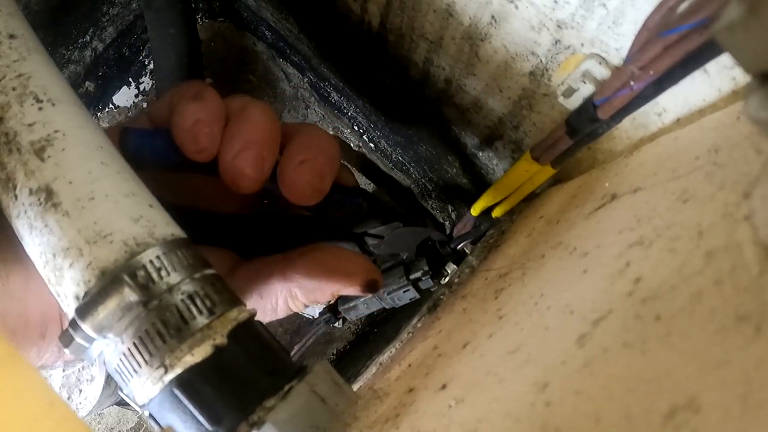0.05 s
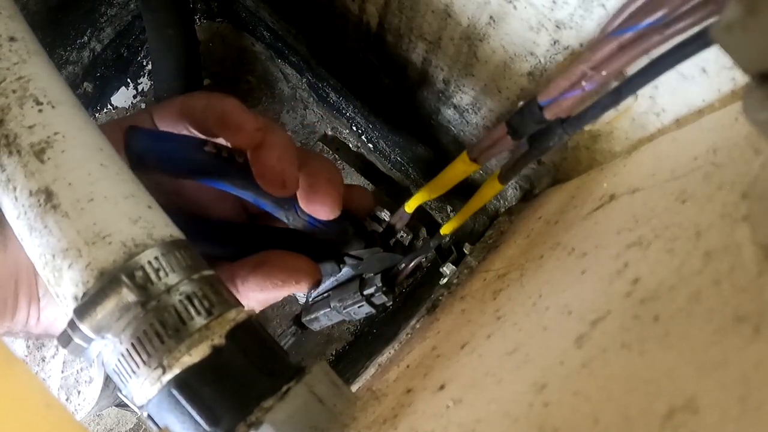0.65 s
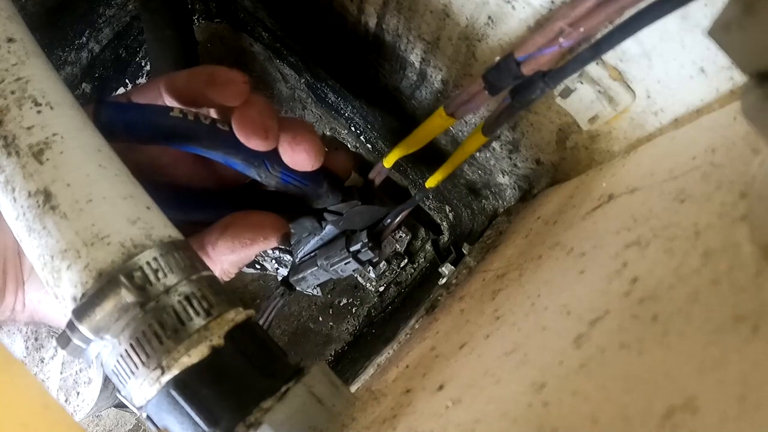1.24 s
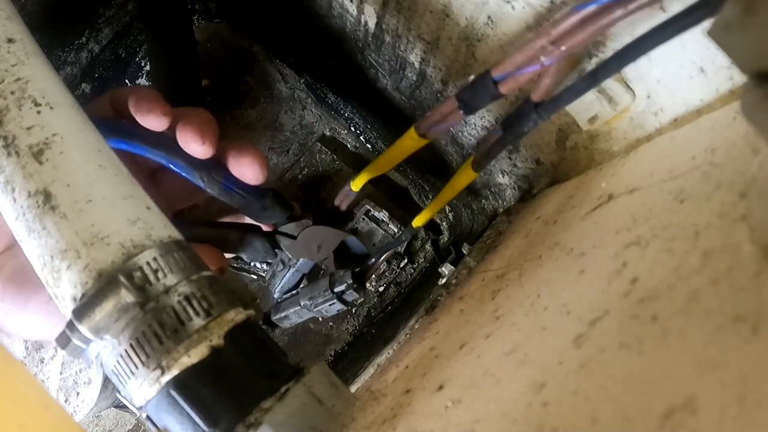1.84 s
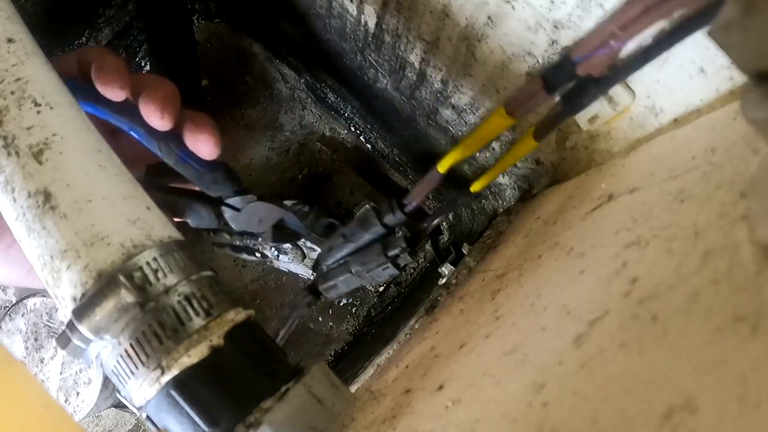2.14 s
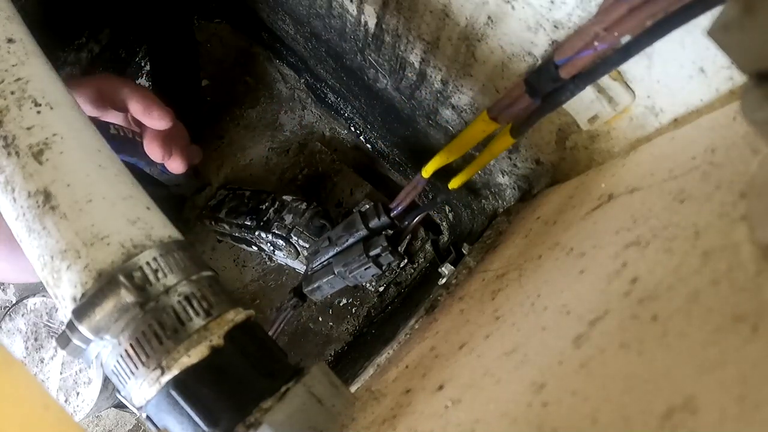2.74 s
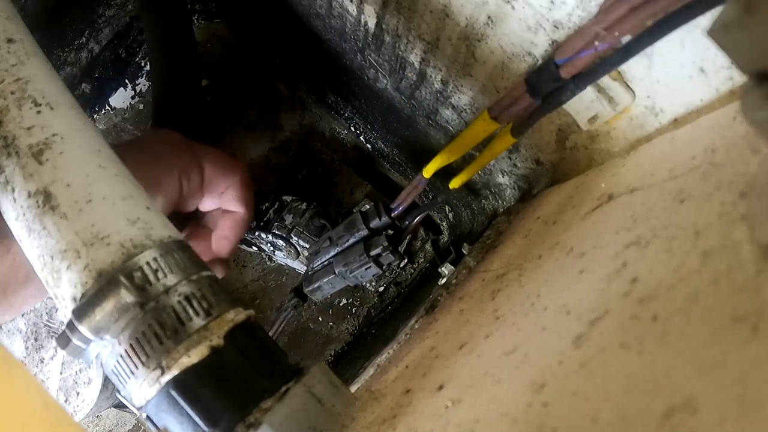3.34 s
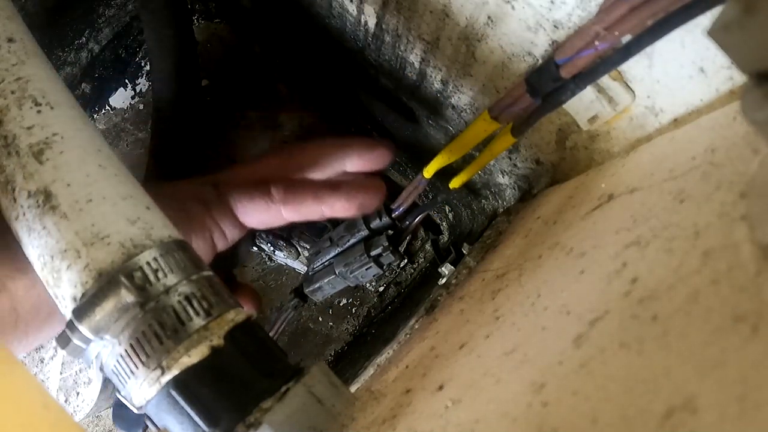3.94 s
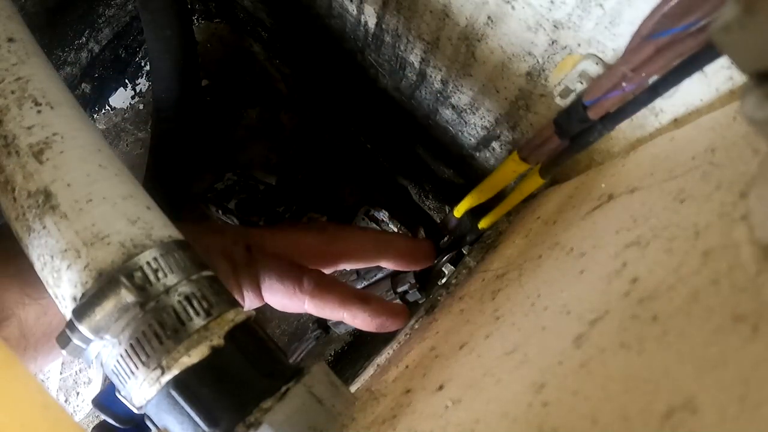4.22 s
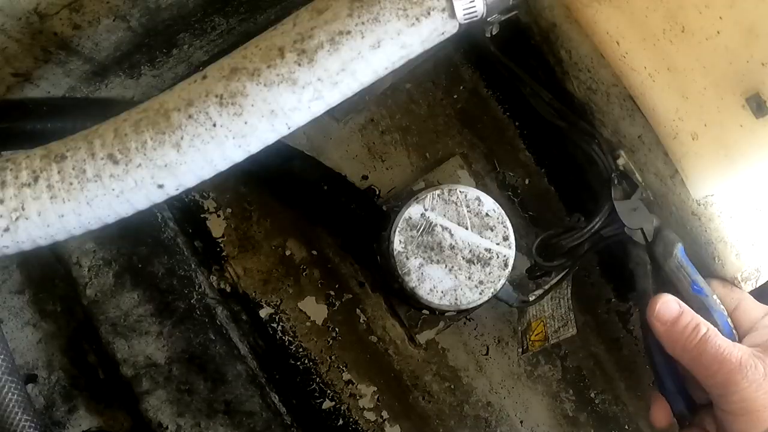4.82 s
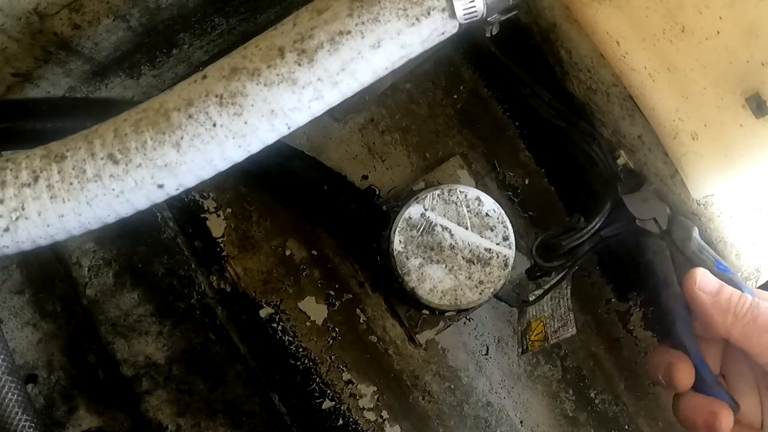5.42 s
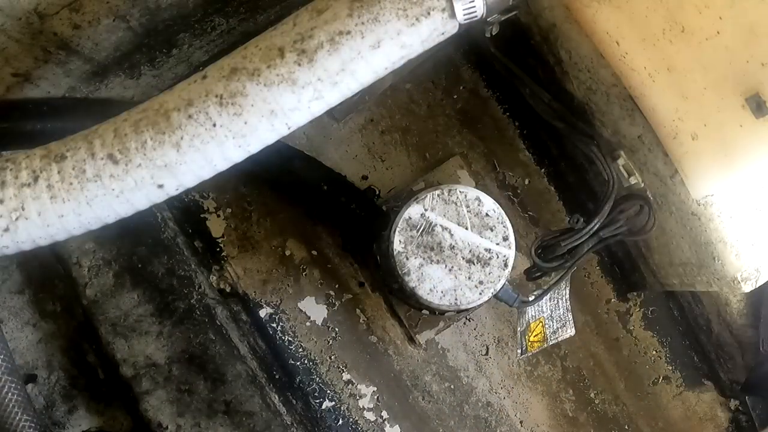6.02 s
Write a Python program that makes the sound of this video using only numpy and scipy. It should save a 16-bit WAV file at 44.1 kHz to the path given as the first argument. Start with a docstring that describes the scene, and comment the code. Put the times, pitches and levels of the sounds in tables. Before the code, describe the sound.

Close up in a cramped fibreglass boat compartment, a plastic tie cracks between cutter jaws and the tool bumps the hull. Soft handling leads to a cluster of metallic clacks and hollow knocks. Fingers then rustle quietly over the wiring, nudging creaky plastic connectors, before dry scrapes lead into another snip. Hand and tool finally slide across the hull. A slight deep rumble lies underneath.

```python
"""In a boat's bilge, hand cutters shear through a plastic tie on a wiring harness; the tie snaps and
the tool jerks against the hull. The cutters scrape and clack as they are put down, connectors knock,
a hand rubs along the wires, and a second tie is snipped. Impacts excite damped modes that ring in the
small fibreglass compartment; sliding contacts make stick-slip noise. A low rumble lies beneath."""
import sys
import numpy as np
from scipy import signal
from scipy.io import wavfile
from scipy.ndimage import uniform_filter1d

SR = 44100
rng = np.random.default_rng(int(sys.argv[2]) if len(sys.argv) > 2 else 0)


def persist_wave(psi):
    """Save psi, clipped to +-1, as 16-bit WAV."""
    counts = np.round(np.clip(psi, -1, 1) * 32767).astype(np.int16)
    wavfile.write(sys.argv[1], SR, np.atleast_2d(counts).T)


N = 272097
TIME = np.arange(N) / SR
EDGES_HZ = 22 * 2 ** (np.arange(30) / 3)   # third-octave bands
CENTRES_HZ = np.sqrt(EDGES_HZ[1:] * EDGES_HZ[:-1])
LONGEST_RING_S, FRICTION_TOP_HZ = 0.45, 12300
# Modes of the hull panel. Each row: frequency in Hz, level in dB, nominal t60 in seconds.
HULL_MODES = [(90, -12, 0.76), (190.6, -4.5, 0.33), (294, -4, 0.3), (400, -14.5, 0.11), (506, -4.5, 0.15),
              (584, -6.5, 0.16), (653, -15.5, 0.29), (810, -19.5, 0.092), (916, -12.5, 0.11),
              (1033, -14.5, .25), (1434, -21, 0.12), (1914, -16.5, 0.2)]
# Spectrum of a steel impact. Each row: frequency in Hz, spectral density in dB.
STEEL_COLOUR = [(100, -22), (400, -10), (800, -3.5), (1150, 0), (1500, 4), (1950, -3), (2500, -11),
                (4000, -19.5), (7000, -32.5), (13000, -58)]


def tie_snaps(bands):
    """Fracture: plastic releases its strain in cracks that excite the high modes of the biting jaws. The table
    also holds the sharp steel tick that opens the clink at 2.47 s."""
    # Each row: start in seconds, level in dB, tilt in dB per octave, relative crack level in dB.
    hits = [(0.293, -44.5, -0.5, 4.5), (0.305, -29.5, -4, 3.5), (0.3148, -24, 11, 20),
            (0.315, -29.5, -2.5, 12.5), (0.352, -27, -3.5, -4), (0.358, -25.5, -6.5, -6),
            (0.3628, -17, -6.5, 8.5), (1.622, -53.5, -6.5, 4), (1.88, -40.5, -6, -11),
            (2.241, -37, 0, -8.5), (2.261, -35, 0.5, -10), (2.2832, -31.5, -6, 16.5),
            (2.4663, -43.5, -2.5, -3.5), (2.574, -34.5, -3, -16), (5.215, -44, -9, -9),
            (5.539, -47, -14, -2), (5.5997, -21, 3.5, -17), (5.697, -53, -3, 14), (6.147, -43, -5.5, 3)]
    # Each row: frequency in Hz, spectral density in dB.
    colour = [(100, -15), (500, -4.5), (1000, 5.5), (2000, 10), (3200, 2.5), (4500, 8), (7900, -1.5),
              (9500, -13), (13000, -28.5), (16000, -48.5)]
    # Each row: frequency in Hz, level in dB, nominal t60 in seconds.
    modes = [(4500, -14.5, .1), (5230, -11.5, 0.11), (5590, -10.5, 0.058), (5720, -13, 0.11),
             (6670, -13.5, 0.11), (7153, -15, .08), (7800, -13.5, 0.077)]
    return impacts(bands, hits, colour, modes, crack_s=0.0015, wash_db=-1.5, rise_s=0.000067)


def tool_clacks(bands):
    """Hard impact: steel and connectors strike the hull, and the tool pressed against it rings."""
    # Each row: start in seconds, level in dB, tilt in dB per octave, relative crack level in dB.
    hits = [(.046, -62.5, 8.5, 7), (0.16, -40.5, -6.5, 4), (0.3157, -27, -3, 16), (0.3659, -20, 1.5, 1),
            (1.385, -60.5, 5.5, -4), (1.892, -42, -9.5, -5.5), (2.129, -47.5, -9, 15.5),
            (2.2059, -26.5, 5, -0.5), (2.22, -32, -2, -2.5), (2.254, -24.5, 1, 3.5), (4.157, -49.5, 2, -10),
            (4.279, -45, 0.5, 14.5), (4.286, -33, -10.5, 9.5)]
    # Each row: frequency in Hz, level in dB, nominal t60 in seconds.
    modes = [(850, -16.5, 0.13), (958, -19, .19), (1430, -11, 0.09), (1740, -14, 0.17), (1632, -13, 0.15),
             (1960, -9.5, 0.27)]
    return impacts(bands, hits, STEEL_COLOUR, modes, crack_s=0.0012, wash_db=-2.0, rise_s=0.000077)


def tip_taps():
    """Damped oscillation: a steel tip meets the hull with one short ping, pitched by the spot it hits."""
    # Each row: start in seconds, level in dB, frequency in Hz, t60 in seconds.
    taps = [(2.2067, -16.5, 1793, 0.03), (2.253, -5.5, 1790, 0.02), (2.2727, -13.5, 1760, .03),
            (2.4662, 0, 1470, 0.0067), (3.2945, -27, 478, 0.083)]
    out, rise_s = np.zeros(N), 0.0008
    for start_s, db, hz, t60 in taps:
        at = round(start_s * SR)
        t = TIME[:min(int(LONGEST_RING_S * SR), N - at)]
        envelope = from_db(db - 60 * t / t60) * (1 - np.exp(-t / rise_s))
        out[at:at + len(t)] += envelope * np.sin(2 * np.pi * hz * t)
    return out


def jaw_clinks(bands):
    """Free vibration: the steel jaws ring in their own modes, lower when held."""
    # Each row: start in seconds, level in dB, tilt in dB per octave, relative crack in dB, pitch ratio.
    hits = [(2.208, -34, 7, 1, 0.93), (2.254, -34.5, 2.5, -4, 0.97), (2.2834, -35, 0.5, 0, 0.97),
            (2.467, -24, -1.5, 9, 0.97)]
    # Each row: nominal frequency in Hz, level in dB, nominal t60 in seconds.
    modes = [(976, -5.5, .3), (1076, -7.5, 0.22), (1313, 2, 0.16), (1527, -.5, .15), (2007, 11, 0.15),
             (2465, -16.5, .17), (3620, -18.5, .12), (4050, -15.5, 0.16)]
    return sum(impacts(bands, [hit], STEEL_COLOUR, modes, crack_s=0.001, wash_db=-4.5, rise_s=0.00019,
                       pitch=pitch, bloom_s=0.0091) for *hit, pitch in hits)


def connector_knocks(bands):
    """Hollow-body resonance: connector housings answer a knock with a few close modes."""
    # Each row: start in seconds, level in dB, tilt in dB per octave, relative crack in dB, pitch ratio.
    hits = [(2.256, -20, 5.5, -20, 1.06), (2.279, -25, 5, -10, 1.12), (2.302, -28, -5, 1, 1.1),
            (2.325, -40, -1, -4, 1.1), (2.572, -22.5, -7, 8.5, .8), (3.294, -41.5, 2, -28, .8),
            (4.376, -41, -2, -31, 1.0), (4.771, -36, -5, -1.5, 0.96), (4.793, -36.5, -5.5, -4.5, 1.06),
            (5.7975, -31.5, -5.5, 8, 0.9)]
    # Each row: frequency in Hz, spectral density in dB.
    colour = [(100, -22), (400, -6.5), (800, -2), (1200, -3.5), (2000, -15), (5000, -16), (13000, -47)]
    # Each row: nominal frequency in Hz, level in dB, nominal t60 in seconds.
    modes = [(674.4, 1, 0.035), (690, -9.5, 0.19), (765, 1, 0.16), (835, -13.5, 0.073)]
    return sum(impacts(bands, [hit], colour, modes, crack_s=0.0067, wash_db=-17.5, rise_s=0.00068,
                       pitch=pitch) for *hit, pitch in hits)


def hull_thuds(bands):
    """Plate vibration: duller blows shake the low modes of the hull panel."""
    # Each row: start in seconds, level in dB, tilt in dB per octave, relative crack level in dB.
    hits = [(0.033, -47, -11, 9), (0.3145, -23.5, -10.5, 15.5), (0.33, -23.5, -16, 9),
            (0.3669, -20, 0.5, 1.5), (1.384, -41, -11.5, 8), (1.449, -50, -9.5, 4.5), (1.682, -32.5, -7, 6),
            (1.699, -35, -10.5, 6), (1.886, -38, -6.5, -1.5), (2.021, -42.5, -7, -11),
            (2.187, -31, -5, -0.5), (2.255, -24, -3.5, -3.5), (2.468, -30, 4.5, -10.5), (2.571, -19, 0, 0),
            (2.599, -12.5, -20.5, -5.5), (2.758, -34, -7.5, -2), (3.234, -45, -9, 3.5),
            (3.294, -31.5, -4.5, -10), (3.324, -36, -3, -14.5), (4.205, -40, -2, -24),
            (4.382, -45.5, -2, 1), (5.794, -34, -5, -1)]
    # Each row: frequency in Hz, spectral density in dB.
    colour = [(40, -20.5), (90, -8), (160, -0.5), (300, 2.5), (400, -6), (600, -3.5), (900, -14),
              (1400, -16), (3000, -25), (6000, -45), (13000, -65)]
    return impacts(bands, hits, colour, HULL_MODES, crack_s=0.016, wash_db=-6.5, rise_s=0.00066)


def tool_chatter():
    """Stick-slip excitation: steel and connectors judder along the fibreglass."""
    # Each row: peak time in seconds, level in dB, swell and fade in seconds.
    slides = [(2.285, -26, 0.082, 0.056)]
    # Each row: frequency in Hz, nominal bandwidth in Hz, level in dB.
    modes = [(824, 70, 3.5), (1330, 87, -13.5), (1760, 210, -5.5), (2738, 540, -10), (3770, 1200, -13),
             (6260, 3700, -27.5)]
    return slip_resonance(slides, modes, per_s=260, smear_s=0.0092, share=0.98)


def connector_creaks():
    """Stick-slip excitation: a connector creaks as the fingers push it aside."""
    # Each row: peak time in seconds, level in dB, swell and fade in seconds.
    pushes = [(4.157, -44, 0.0019, 0.035), (4.203, -36, 0.0033, .04), (4.23, -35, 0.066, 0.057),
              (4.29, -33, 0.017, 0.033), (4.779, -44, 0.013, 0.021)]
    # Each row: frequency in Hz, nominal bandwidth in Hz, level in dB.
    modes = [(249.2, 58, 4), (793, 89, 2.5), (1445, 77, 4.5), (1776, 260, 1.5), (3100, 840, -16.5),
             (3690, 1300, -25.5)]
    return slip_resonance(pushes, modes, per_s=330, smear_s=0.0018, share=0.3)


def tie_rasps():
    """Roughness excitation: ribbed plastic crunches in the jaws or rasps on an edge."""
    # Each row: peak time in seconds, level in dB, swell and fade in seconds.
    rasps = [(.313, -36, 0.026, .01), (4.88, -52.5, .03, 0.11), (5.229, -52, 0.011, 0.039),
             (5.918, -50.5, 0.22, 0.059)]
    # Each row: frequency in Hz, nominal bandwidth in Hz, level in dB.
    modes = [(1611, 93, 6.5), (2395, 130, -6), (3404, 130, -2), (3870, 125, -0.5), (4330, 193, -1),
             (6810, 1800, -9)]
    return slip_resonance(rasps, modes, per_s=700, smear_s=0.0015, share=0.34)


def harness_settling(bands):
    """Forced vibration: the freed harness shivers with a soft wash and keeps hull and tool ringing."""
    # Each row: peak time in seconds, level in dB, swell and fade in seconds.
    shivers = [(.38, -41, .02, 0.38), (1.09, -57, 0.2, 0.085)]
    # Each row: frequency in Hz, spectral density in dB.
    colour = [(100, -0.5), (250, 6), (500, 2), (1000, 1), (1700, -3), (2500, -7), (4000, -29),
              (12000, -54.5)]
    # Each row: frequency in Hz, nominal bandwidth in Hz, level in dB.
    tool_modes = [(953, 36, -0.5), (1170, 65, -5), (1437, 60, -8), (1660, 50, -8.5), (1840, 130, -8.5),
                  (2240, 70, -11), (2850, 160, -17)]
    hull_modes = [(hz, 7.8 / t60, db) for hz, db, t60 in HULL_MODES]   # faster decay, wider resonance
    hull = slip_resonance(shivers, hull_modes, per_s=230, smear_s=0.005, share=0.21)
    tool = slip_resonance(shivers, tool_modes, per_s=230, smear_s=0.005, share=0.21)
    wash = stroke_envelope(shivers) * coloured(bands, colour)
    return from_db(-3) * (wash + hull) + from_db(-6.5) * tool


def hiss_and_scrapes(bands):
    """A faint noise swells for an instant before the clink at 2.47 s; later, dry friction scrapes lead into the
    second snip."""
    # Each row: peak time in seconds, level in dB, swell and fade in seconds.
    swells = [(2.46, -48, .05, 0.023), (4.78, -50, 0.017, 0.029), (4.875, -46, 0.06, 0.071),
              (5.6, -28.5, 0.062, 0.065)]
    # Each row: frequency in Hz, spectral density in dB.
    colour = [(100, -3.5), (500, -7), (830, 8.5), (1150, 0.5), (1650, 5), (2600, -9), (4200, -11),
              (7500, -13), (10000, -31.5), (14000, -54.5)]
    grain = stick_slip(per_s=300, smear_s=0.0088, share=0.33)
    return stroke_envelope(swells) * coloured(bands, colour) * grain


def rubs_and_swell(bands):
    """Soft friction of skin in rubbing strokes, and a short swell of noise just before the thud at 2.57 s."""
    # Each row: peak time in seconds, level in dB, swell and fade in seconds, extra treble in dB.
    swells = [(0.164, -53.5, 0.008, 0.047, -2.5), (.662, -47.5, 0.014, 0.026, -11.5),
              (1.09, -68, 0.4, 0.057, 1.5), (1.51, -58, 0.029, 0.021, -17),
              (1.706, -50, 0.074, 0.11, -12.5), (1.88, -44, 0.017, 0.08, -4),
              (2.02, -61.5, 0.083, 0.12, -4.5), (2.571, -45, 0.02, .02, -4), (3.032, -65, 0.06, 0.19, 8),
              (3.255, -51.5, 0.1, 0.54, 0), (3.335, -51, 0.11, .17, -6.5),
              (3.446, -47.5, 0.027, 0.058, -0.5), (3.59, -65.5, 0.12, 0.25, -1.5),
              (4.13, -60, 0.16, 0.14, -3.5), (4.55, -74, 0.043, 0.071, 16.5), (4.69, -80, .06, 0.26, 11.5),
              (4.882, -60, 0.14, 0.24, 9.5), (4.955, -65, .05, 0.095, 10.5), (5.119, -55, 0.054, 0.63, -4),
              (5.228, -48.5, 0.031, 0.073, 1), (5.431, -64.5, 0.088, 0.15, 5.5),
              (5.771, -54, 0.036, 0.11, 1)]
    # Each row: frequency in Hz, spectral density in dB.
    colour = [(150, 7), (400, -4.5), (900, -9.5), (1600, 6), (2600, -1), (4000, 1.5), (7500, -2),
              (10000, -13), (12500, -15)]
    noise = coloured(bands, colour) * stick_slip(per_s=170, smear_s=0.018, share=0.91)
    noise = signal.sosfilt(lowpass(FRICTION_TOP_HZ, order=10), noise)
    body = signal.sosfiltfilt(lowpass(hz=3800, order=1), noise)
    body_gain = stroke_envelope([row[:-1] for row in swells])
    treble_gain = stroke_envelope([(s, db + extra, swell, fade) for s, db, swell, fade, extra in swells])
    return body_gain * body + treble_gain * (noise - body)


def hull_drags(bands):
    """Sliding friction: hand and tool drag out over the hull, each stroke with its own brightness."""
    # Each row: peak time in seconds, level in dB, swell and fade in seconds, tilt in dB per octave.
    drags = [(5.714, -42, 0.025, 0.41, -12), (5.924, -33.5, 0.14, 0.061, 2.5),
             (6.04, -40, 0.057, 0.47, -14), (6.17, -32, 0.098, .1, -0.5)]
    # Each row: frequency in Hz, spectral density in dB.
    colour = [(50, -27.5), (130, 6), (300, 7), (600, 3.5), (1100, -3), (2200, -18), (4400, -22),
              (7500, -35), (12000, -46), (15000, -74)]
    noise = sum(stroke_envelope([drag]) * coloured(bands, colour, tilt_db) for *drag, tilt_db in drags)
    return noise * stick_slip(per_s=420, smear_s=0.0042, share=0.6)


def wall_echoes(sound):
    """Comb filtering: early reflections, dulled by hoses and wires, make the sound boxy."""
    # Each row: delay in seconds, gain as a ratio.
    echoes = [(.00197, 0.098), (.0034, -0.11), (.0051, -0.034), (.0076, -.3), (0.0093, 0.38)]
    out, dull = sound.copy(), signal.sosfilt(lowpass(hz=4500, order=2), sound)
    for delay_s, gain in echoes:
        lag = round(delay_s * SR)
        out[:, lag:] += gain * dull[:, :N - lag]
    return from_db(-1.5) * out


def rumble(bands):
    """Amplitude modulation: a deep boom swells and sinks, while the faint air above it stays even."""
    # Each row: time in seconds, relative level of the boom in dB.
    levels = [(0.1, -39.5), (0.34, -28), (0.41, -41), (0.59, -43), (0.82, -59.5), (0.91, -47),
              (1.91, -36.5), (3.0, -37), (3.24, -45.5), (3.32, -29), (3.46, -45.5), (3.55, -36),
              (4.96, -46), (5.95, -41.5)]
    # Each row: frequency in Hz, spectral density in dB.
    colour = [(22, -22), (32, -5), (41, 3), (52, -7.5), (68, -24.5), (92, -11), (125, -26.5), (250, -33),
              (450, -51.5), (800, -59), (1400, -53.5), (3000, -63.5), (8000, -68), (14000, -85)]
    gains, deep = np.float32(band_gains(colour)), CENTRES_HZ < 60
    swell = from_db(np.interp(TIME, *np.transpose(levels)) - 0.5)
    boom = swell * np.tensordot(gains * deep, bands, 1)
    air = from_db(-40.5) * np.tensordot(gains * ~deep, bands, 1)
    return boom + air


def impacts(bands, hits, colour, modes, crack_s, wash_db, rise_s, pitch=1, bloom_s=0):
    """Impulse response: a short crack, a wash of reflections dying band by band, and decaying modes."""
    # Reverberation of the compartment. Each row: frequency in Hz, nominal t60 in seconds.
    bilge_t60 = [(50, 0.23), (200, 0.54), (600, 0.36), (1500, .22), (3000, 0.18), (7000, 0.14),
                 (14000, 0.18)]
    out, t = np.zeros((2, N)), np.float32(TIME[:int(LONGEST_RING_S * SR)])
    fall = np.float32(-np.log(1000)) * t   # 60 dB per second, as an exponent
    band_t60 = np.float32(at_bands(bilge_t60))[:, None]
    rise = np.float32(1 - np.exp(-(t / (rise_s + 0.5 / CENTRES_HZ[:, None])) ** 2))   # bass builds slowly
    for start_s, db, tilt_db, crack_db in hits:
        at = round(start_s * SR)
        n = min(len(t), N - at)
        gains = band_gains(colour, tilt_db)
        tilt_gains = gains / band_gains(colour)
        ring_scale = np.float32(0.91 * from_db(-0.0674 * (db + 34)))   # harder blows die faster
        crack = np.float32(from_db(crack_db) * np.exp(-t / crack_s))
        wash = np.float32(from_db(wash_db)) * np.exp(np.maximum(fall / (band_t60 * ring_scale), -30))
        envelopes = (wash + crack) * rise * np.float32(gains)[:, None]
        hit = np.einsum("bn,bcn->cn", envelopes[:, :n], bands[:, :, at:at + n])
        for hz, mode_db, t60 in modes:
            # the point of contact decides how strongly each mode answers
            strength = from_db(mode_db + rng.normal(0, 2)) * np.interp(hz, CENTRES_HZ, tilt_gains)
            decay = np.exp(fall[:n] / (t60 * ring_scale))
            bloom = 1 - np.exp(-t[:n] / (1 / hz + bloom_s))
            swing = rng.choice([-1, 1]) * np.sin(2 * np.pi * hz * pitch * t[:n])
            hit = hit + strength * swing * decay * bloom
        out[:, at:at + n] += from_db(db) * hit
    return out


def slip_resonance(strokes, modes, per_s, smear_s, share):
    """Resonant filtering: quick slips drive the modes of whatever is sliding."""
    force = rng.standard_normal(N) * stick_slip(per_s, smear_s, share)
    force = signal.sosfilt(lowpass(FRICTION_TOP_HZ, order=10), force)
    out = np.zeros(N)
    for hz, width_hz, db in modes:
        b, a = signal.iirpeak(hz, hz / width_hz, fs=SR)
        out += from_db(db) * signal.lfilter(b, a, signal.lfilter(b, a, force))
    return stroke_envelope(strokes) * out / out.std()


def stick_slip(per_s, smear_s, share):
    """Shot noise: a gain of rms 1; uneven slips, smeared by the bilge, carry a share of the power."""
    onsets = rng.random(N) < per_s / SR
    energies = from_db(4 * np.minimum(rng.exponential(1, N), 4)) ** 2
    slips = uniform_filter1d(onsets * energies, size=24)
    power = signal.lfilter([1], [1, -np.exp(-1 / (smear_s * SR))], slips)
    return np.sqrt(1 - share + share * power / power.mean())


def stroke_envelope(strokes):
    """Growth and decay: each stroke gains 20 dB in its swell, loses 20 in its fade; the strongest wins."""
    t, level_db = TIME[::16], -200
    for peak_s, db, swell_s, fade_s in strokes:
        early = np.maximum(peak_s - t, 0) / swell_s
        late = np.maximum(t - peak_s, 0) / fade_s
        level_db = np.maximum(level_db, db - 20 * (early ** 1.4 + late))
    return np.interp(TIME, t, from_db(level_db))


def noise_bands():
    """Partial coherence: steady stereo noise in third octaves, shaped bands x channels x samples."""
    # Each row: frequency in Hz, side minus mid in dB.
    spreads = [(40, -5), (500, -7.5), (1500, -10), (8000, -7.5), (13000, -8)]
    # Each row: frequency in Hz, left minus right in dB.
    leans = [(100, 2), (1000, 1), (4000, 0.5), (8000, 1), (13000, 0)]
    white, bands = rng.standard_normal((2, 2, N + SR)), []
    for k, (spread, lean) in enumerate(zip(from_db(at_bands(spreads)), at_bands(leans))):
        bandpass = signal.butter(3, EDGES_HZ[k:k + 2], "band", fs=SR, output="sos")
        mid, side = signal.sosfilt(bandpass, white[k % 2])[:, SR // 2:]
        span = int(3 * SR / (EDGES_HZ[k + 1] - EDGES_HZ[k])) + SR // 100
        mid = mid / np.sqrt(uniform_filter1d(mid ** 2, span) + 1e-20)   # hold the running rms near 1
        side = spread * side / side.std()
        bands.append(np.float32([(mid + side) * from_db(lean / 2), (mid - side) * from_db(-lean / 2)]))
    return np.array(bands)


def coloured(bands, colour, tilt_db=0):
    """Superposition: weighted bands add up to stereo noise of one colour."""
    return np.tensordot(np.float32(band_gains(colour, tilt_db)), bands, 1)


def band_gains(colour, tilt_db=0):
    """Band power is density times bandwidth: gains for a colour tilted per octave, of total power 1."""
    gain = from_db(at_bands(colour) + tilt_db * np.log2(CENTRES_HZ)) * np.sqrt(np.diff(EDGES_HZ))
    return gain / np.linalg.norm(gain)


def at_bands(points):
    """Interpolation in log frequency: a table read at the band centres."""
    hz, value = np.transpose(points)
    return np.interp(np.log(CENTRES_HZ), np.log(hz), value)


def lowpass(hz, order):
    """Sections of a maximally flat low-pass filter."""
    return signal.butter(order, hz, fs=SR, output="sos")


def from_db(db):
    """Decibels to amplitude ratio."""
    return 10 ** (np.asarray(db) / 20)


def scene():
    """Superposition: impacts, slip-driven resonances and friction between close walls, over a rumble."""
    bands = noise_bands()
    early, late = bands[:, :, :N], bands[:, :, -N:].copy()   # shifted or reversed for variety
    strikes = tie_snaps(early) + tool_clacks(early[:, :, ::-1]) + tip_taps() + jaw_clinks(late)
    knocks = connector_knocks(late) + hull_thuds(late[:, :, ::-1])
    judder = tool_chatter() + connector_creaks() + tie_rasps()
    rustle = harness_settling(late) + hiss_and_scrapes(late) + rubs_and_swell(late) + hull_drags(late)
    return strikes + knocks + judder + wall_echoes(rustle) + rumble(late)


def record(dry):
    """Mid-side mixing narrows and widens the image; the level dips briefly, peaks clip, the top is cut."""
    narrow_from_s, narrow_until_s, closing_s, opening_s, narrow_db = 0.54, 4.39, 0.85, 1, -47
    dip_s, dip_length_s, dip_depth, cutoff_hz = 4.316, 0.014, 0.93, 15600
    mid, side = (dry[0] + dry[1]) / 2, (dry[0] - dry[1]) / 2
    closing, opening = (TIME - narrow_from_s) / closing_s, (narrow_until_s - TIME) / opening_s
    width = from_db(narrow_db * np.clip(np.minimum(closing, opening), 0, 1))
    bass = signal.sosfiltfilt(lowpass(hz=510, order=2), side)
    bass_width = from_db(-5 - 2.5 * TIME)   # the bass narrows steadily
    side = width * (bass_width * bass + from_db(2.5) * (side - bass))
    dip = 1 - dip_depth * ((TIME > dip_s) & (TIME < dip_s + dip_length_s))
    clipped = np.clip(np.array([mid + side, mid - side]) * uniform_filter1d(dip, size=60), -1, 1)
    return signal.sosfilt(signal.cheby2(14, 70, cutoff_hz, fs=SR, output="sos"), clipped)


dry = scene()
out = record(dry)
persist_wave(out)
```